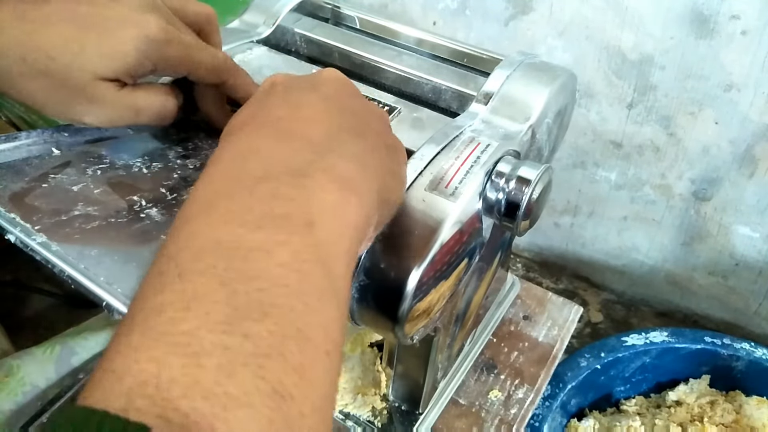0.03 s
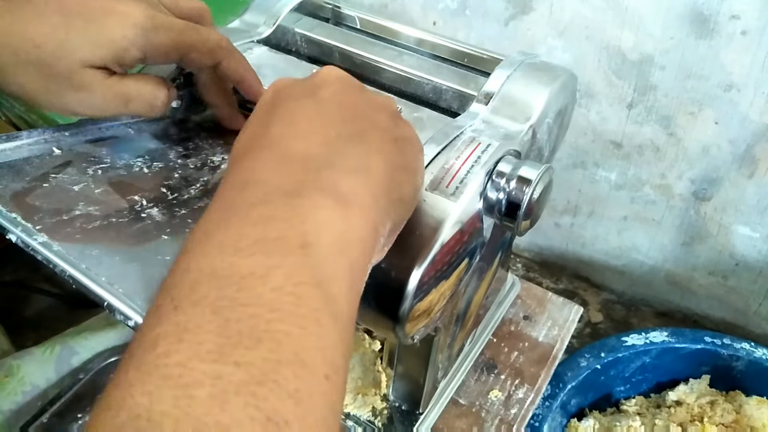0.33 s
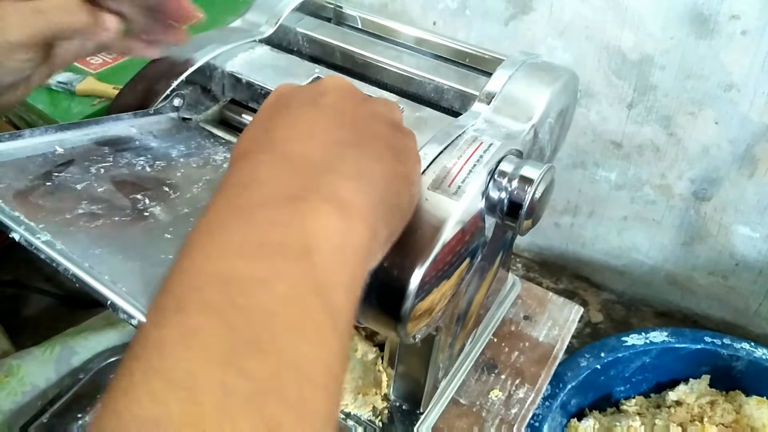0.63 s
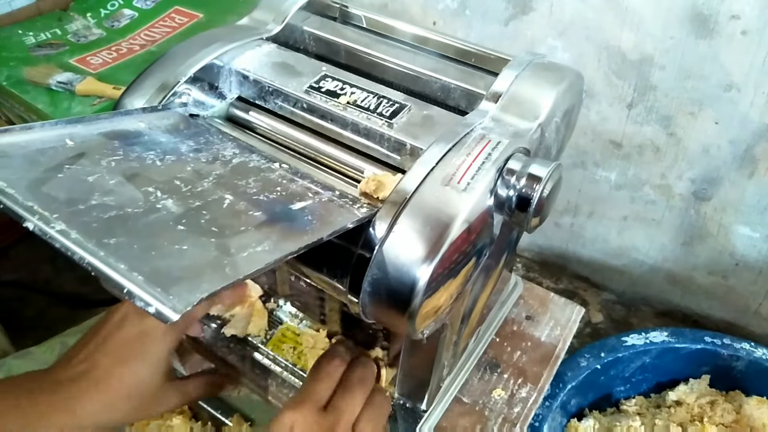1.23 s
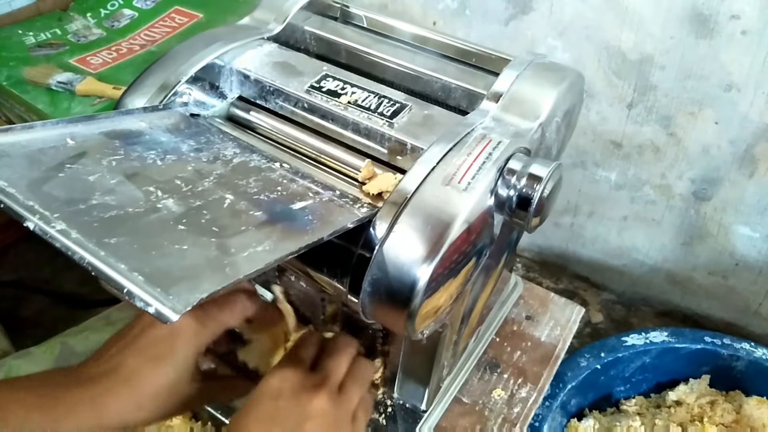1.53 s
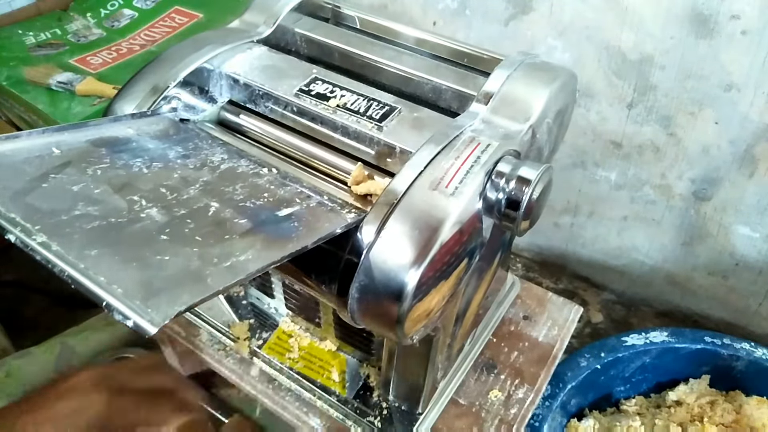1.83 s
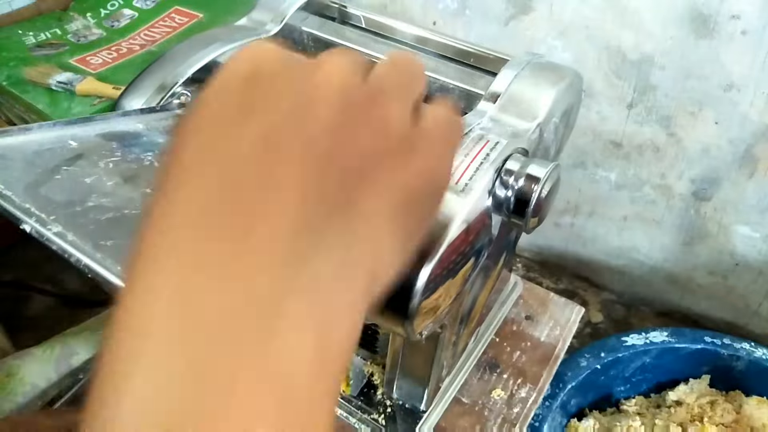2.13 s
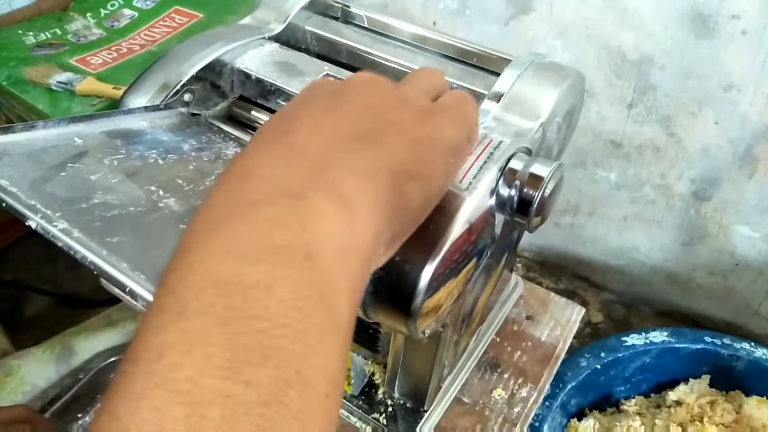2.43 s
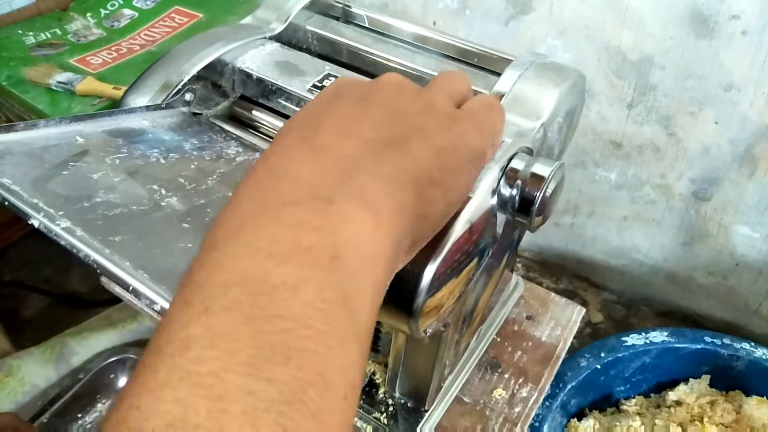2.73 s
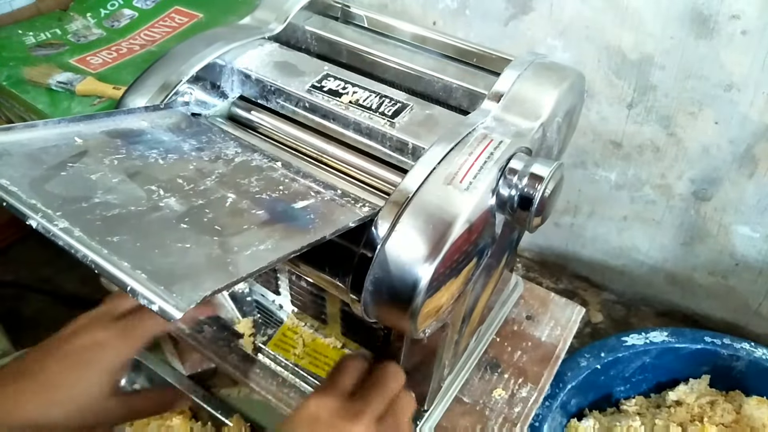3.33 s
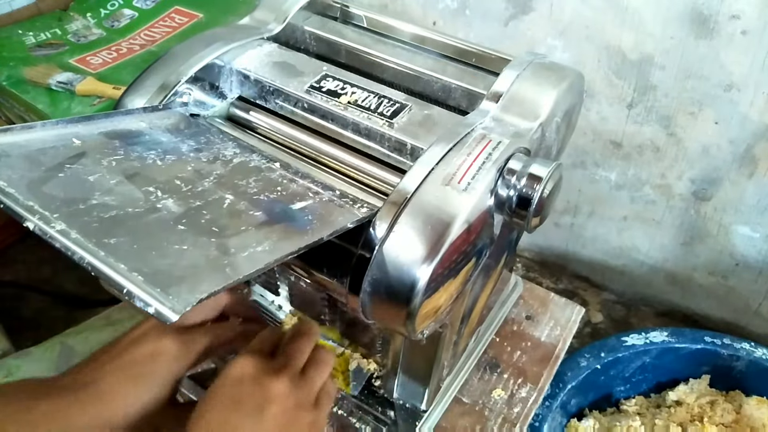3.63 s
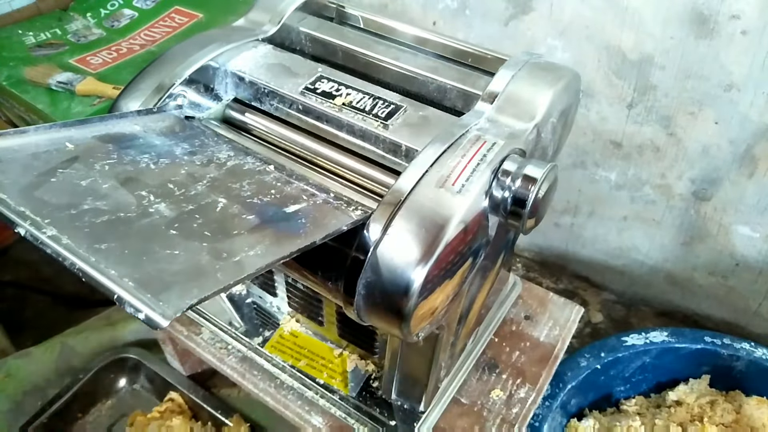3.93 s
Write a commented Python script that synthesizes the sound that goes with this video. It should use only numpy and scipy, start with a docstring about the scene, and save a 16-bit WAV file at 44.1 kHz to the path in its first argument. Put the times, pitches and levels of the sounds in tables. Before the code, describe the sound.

Gears of an electric noodle machine whine and grind close by, amid short metallic rattles.

```python
"""The gears of an electric noodle machine whine and grind close by in a small, hard room.
A 23-tooth pinion (the small gear) drives a 40-tooth wheel, throbbing at a tight spot once per wheel turn.
Worn teeth scrape and ring the steel housing, and loose metal parts rattle in short bursts.
Behind them the motor hums and shakes the table, hands shift the tray twice, and faint groans come and go."""
import sys
import numpy as np
from scipy import signal
from scipy.fft import rfft, irfft
from scipy.io import wavfile
from scipy.ndimage import uniform_filter1d, minimum_filter1d

SR = 44100
rng = np.random.default_rng(int(sys.argv[2]) if len(sys.argv) > 2 else 0)


def int16_out(signal):
    """Quantize to a 16-bit WAV file."""
    q = np.round(np.clip(np.atleast_2d(signal).T, -1, 1) * 32767)
    wavfile.write(sys.argv[1], SR, q.astype(np.int16))


N = 176400
TIME = np.arange(N) / SR


def undb(db):
    """Turn decibels into a number to multiply by."""
    return 10 ** (np.asarray(db) / 20)


def unit(x):
    """Scale a signal to an average power of 1."""
    return x / np.sqrt(np.mean(x ** 2))


def curve(rows):
    """A volume that glides between (time [s], level [dB]) points."""
    return undb(np.interp(TIME, *np.array(rows).T))


def swell(start, length):
    """A rounded rise and fall."""
    return np.sin(np.pi * np.clip((TIME - start) / length, 0, 1))


def wander(per_s):
    """A smooth random drift, roughly 1 up or down."""
    hold = int(SR / per_s)
    steps = np.repeat(rng.standard_normal(N // hold + 1), hold)
    return 1.3 * uniform_filter1d(uniform_filter1d(steps, hold), hold)[:N]


def response(rows, peaks=()):
    """A tone colour in dB: a line through the rows, plus peaks where something rings."""
    freqs = np.arange(N + 1) * SR / (2 * N) + 1e-9
    hz, db = np.array(rows).T
    lifts = sum(lift / (1 + (2 * (freqs - centre) / width) ** 2) for centre, width, lift in peaks)
    return np.interp(np.log(freqs), np.log(hz), db) + lifts


def colour(x, db):
    """Give a sound a tone colour; white noise keeps its power."""
    cepstrum = irfft(np.log(unit(undb(db))))
    cepstrum[1:N] *= 2  # folded so that ringing follows a hit and never comes before it
    cepstrum[N + 1:] = 0
    return irfft(rfft(x, 2 * N) * np.exp(rfft(cepstrum)))[:N]


def ring(x, t60, wet_db):
    """Add a tail of echoes that fades at 60 dB per t60 seconds, keeping the power."""
    t = np.arange(SR // 2) / SR
    tail = rng.standard_normal(len(t)) * np.exp(-np.log(1000) * t / t60)
    echoes = signal.fftconvolve(x, tail / np.linalg.norm(tail))[:N]
    wet = undb(wet_db)
    return (x + wet * echoes) / np.hypot(1, wet)


# Tone colour of the shaking table (frequency [Hz], relative level [dB])
RUMBLE_COLOUR = [(20, -22.5), (45, -5), (55, -9.5), (65, 8), (78, -4.5), (110, -2.5), (190, -2), (270, -9),
                 (310, 2), (390, -9), (700, -23.5), (2000, -65)]
# How loud the table rumbles (time [s], level [dB])
RUMBLE_LOUDNESS = [(0, -33), (.7, -32), (1.6, -32.5), (2.5, -32.5), (2.9, -35.5), (4, -36)]
def motor(hum_hz=100, hum_db=-38.5):
    """The motor hums with the mains power and shakes the table into a rumble."""
    hum = np.sqrt(2) * np.sin(2 * np.pi * hum_hz * TIME) * undb(hum_db + 1.9 * wander(7.3))
    rumble = colour(rng.standard_normal(N), response(RUMBLE_COLOUR))
    return hum + curve(RUMBLE_LOUDNESS) * rumble


# Faint low groans (start [s], length [s], starting pitch [Hz], level [dB])
GROAN_EVENTS = [(1.931, 0.46, 316, -33), (2.66, 0.42, 304, -39.5), (3.7, 0.47, 312, -40.5)]
def groans(sag_hz_per_s=41):
    """A faint low tone comes and goes, sagging in pitch."""
    out = np.zeros(N)
    for start, length, hz, db in GROAN_EVENTS:
        pitch = hz - sag_hz_per_s * (TIME - start) + 3 * wander(25)
        tone = np.sqrt(2) * np.sin(2 * np.pi * np.cumsum(pitch) / SR)
        out += undb(db + 2 * wander(20)) * swell(start, length) * tone
    return out


# Hollow tone colour of the tray (frequency [Hz], relative level [dB])
TRAY_COLOUR = [(300, -39), (580, -25.5), (670, 1.5), (800, -6), (900, -16), (2000, -35), (8000, -70)]
# Shifts of the tray (start [s], length [s], level [dB])
TRAY_SHIFTS = [(0.832, .24, -18.5), (1.342, .08, -18)]
def tray_scrapes():
    """Hands shift the tray, and the uneven rubbing rings its low note."""
    rubbing = rng.standard_normal(N) * undb(1.8 * wander(60))
    hollow = unit(colour(rubbing, response(TRAY_COLOUR)))
    return hollow * sum(undb(db) * swell(start, length) for start, length, db in TRAY_SHIFTS)


# Tone colour of the steel housing (frequency [Hz], relative level [dB])
HOUSING_COLOUR = [(150, -23), (420, -20), (510, -6.5), (590, -2), (740, 0), (950, -4.5), (1300, -8),
                  (2000, -8), (2700, -11.5), (3200, -13.5), (3900, -21.5), (5000, -29.5), (6300, -39),
                  (7600, -61.5), (15000, -64)]
# Notes at which its panels ring (frequency [Hz], width [Hz], boost [dB])
PANEL_NOTES = [(672, 39, 4), (731, 32, 4), (853, 29, 4), (940, 28, 4.5), (1054, 36, 3), (1425, 45, 4),
               (1498, 20, 3.5), (1550, 36, 6.5), (1677, 36, 5.5), (1744, 96, 5), (2219, 42, 4),
               (2304, 38, 4.5), (2405, 63, 7), (2520, 34, 6.5), (2890, 200, 4.5), (3500, 110, 2),
               (4320, 130, 3.5)]
def housing(push, ring_db, tilt_db=0):
    """The steel housing rings briefly with every push and colours its sound."""
    ringing = ring(push, t60=0.065, wet_db=ring_db)
    return colour(ringing, response(HOUSING_COLOUR, PANEL_NOTES) + tilt_db)


# Bursts of rattling (start [s], length [s], body level before boost [dB], tick level before boost [dB])
RATTLE_BURSTS = [(0.149, 0.017, -17, -70.5), (0.459, 0.025, -22.5, -63), (0.765, 0.011, -17, -54.5),
                 (0.91, 0.018, -16.5, -60.5), (1.056, 0.04, -28, -73), (1.22, 0.024, -19, -62),
                 (1.275, 0.015, -17, -58), (1.348, 0.012, -17, -64), (1.407, 0.021, -16.5, -60),
                 (1.495, 0.0065, -30, -68), (1.534, 0.011, -8, -61), (1.553, 0.0192, -18, -55),
                 (1.618, 0.014, -7, -41.5), (1.685, 0.0094, -14.5, -51), (1.837, 0.022, -18.5, -53),
                 (1.895, 0.012, -17.5, -49), (1.977, 0.012, -7.5, -43.5), (2.039, 0.021, -24, -60),
                 (2.119, 0.013, -7.5, -42), (2.17, 0.023, -19.5, -53), (2.26, 0.016, -21, -59),
                 (2.299, 0.014, -12.5, -48), (2.325, 0.02, -15, -50), (2.4, 0.019, -18, -55),
                 (2.451, 0.015, -10.5, -49), (2.47, 0.011, -14, -46), (2.535, 0.014, -18, -58),
                 (2.607, 0.012, -15, -52), (2.774, 0.02, -18, -53), (2.811, 0.028, -19.5, -55),
                 (2.883, 0.034, -18.5, -53), (2.939, 0.026, -19, -52), (3.032, 0.021, -14, -47),
                 (3.099, 0.016, -13.5, -42.5), (3.174, 0.0091, -25, -53), (3.184, 0.015, -19, -48),
                 (3.219, 0.016, -16.5, -49.5), (3.313, 0.011, -14.5, -48), (3.346, 0.0097, -18, -48),
                 (3.379, 0.014, -16, -47), (3.435, 0.0062, -14, -47), (3.455, 0.015, -10, -36),
                 (3.525, 0.019, -16, -47.5), (3.598, 0.0079, -20, -58), (3.664, 0.033, -18.5, -50.5),
                 (3.723, 0.034, -20.5, -55), (3.8, 0.017, -19.5, -53), (3.832, 0.019, -16.5, -46.5),
                 (3.945, 0.02, -11, -40)]
# How a rattle's colour differs from the housing's (frequency [Hz], change [dB])
RATTLE_COLOUR = [(300, -6), (700, -2), (1500, -1), (3000, 1.5), (6000, 4), (15000, -2)]
# Bright tick of metal on metal (frequency [Hz], relative level [dB])
TICK_COLOUR = [(2000, -10), (4400, 5.5), (6000, 10), (8000, 3), (11000, -2.5), (13500, -2.5), (15500, -5)]
# Notes at which the loose parts ring (frequency [Hz], width [Hz], boost [dB])
PART_NOTES = [(2450, 140, 8), (4560, 230, 7.5), (5400, 180, 2.5), (9500, 670, 1.5), (13300, 900, 3)]
def rattles(hits_per_s=1800, rise_s=0.0029, fall_s=0.0018, body_boost_db=3.5, tick_boost_db=9):
    """Loose steel parts chatter in bursts of tiny hits that ring the housing and tick brightly."""
    hits = (rng.random(N) < hits_per_s / SR) * rng.choice([-1, 1], N)
    strength = undb(2.5 * rng.standard_normal(N))
    chatter = unit(hits * strength) + 0.67 * rng.standard_normal(N)
    body, ticks = np.zeros(N), np.zeros(N)
    for start, length, body_db, tick_db in RATTLE_BURSTS:
        rise = np.clip((TIME - start) / rise_s, 0, 1)
        shape = rise * np.exp(-np.clip((TIME - start - length) / fall_s, 0, 20))
        burst = shape * chatter
        burst *= np.linalg.norm(shape) / (np.linalg.norm(burst) + 1e-9)  # as strong with few hits as many
        body += undb(body_db + body_boost_db) * burst
        ticks += undb(tick_db + tick_boost_db) * burst
    steel = housing(body, ring_db=-10.5, tilt_db=response(RATTLE_COLOUR))
    ringing_ticks = ring(ticks, t60=0.33, wet_db=-5.5)
    return steel + colour(ringing_ticks, response(TICK_COLOUR, PART_NOTES))


MESH_HZ, PINION_TEETH, WHEEL_TEETH = 569.4, 23, 40  # teeth meeting per second; teeth on each gear
def tight_spot(teeth, first_s=0.023, half_width_s=0.009):
    """A bump from 0 to 1 and back as the gears press harder once per wheel turn."""
    turns = (teeth - first_s * MESH_HZ) / WHEEL_TEETH
    away_s = (turns - np.round(turns)) * WHEEL_TEETH / MESH_HZ
    return np.exp(-(away_s / half_width_s) ** 2)


# How loud the teeth grind (time [s], level [dB])
GRIND_LOUDNESS = [(0, -16), (.35, -19), (.7, -18), (.92, -17), (1.15, -16), (1.45, -15.5), (1.78, -17.5),
                  (2.3, -16), (2.7, -18.5), (3.4, -17.5), (4, -15.5)]
def grinding(teeth, scatter_db=1.5, fade_teeth=0.51, wear_db=-16, throb=0.25):
    """Each tooth scrapes with its own force; the pinion's wear marks come back every turn."""
    strength = undb(scatter_db * rng.standard_normal(N))[teeth.astype(int)]
    scrape = rng.standard_normal(N) * strength * np.exp(-(teeth % 1) / fade_teeth)
    turn_samples = int(SR * PINION_TEETH / MESH_HZ)
    place_in_turn = (teeth / PINION_TEETH % 1 * turn_samples).astype(int)
    wear = rng.standard_normal(turn_samples)[place_in_turn] * strength
    force = (1 + throb * tight_spot(teeth)) * undb(0.79 * wander(45))
    push = unit((unit(scrape) + undb(wear_db) * unit(wear)) * force)
    return curve(GRIND_LOUDNESS) * unit(housing(push, ring_db=-7.5))


# Side tones of the pinion (pitch [cycles per turn])
PINION_TONES = [22, 24, 26, 30, 45, 46, 48, 57, 68, 70, 71, 93, 94]
# How loud each one is (level [dB])
PINION_LEVELS = [-36.5, -31, -41.5, -34, -37, -36, -42.5, -37, -37, -36.5, -37.5, -40.5, -40.5]
# Side tones of the wheel (pitch [cycles per turn])
WHEEL_TONES = [16, 32, 47, 48]
# How loud each one is (level [dB])
WHEEL_LEVELS = [-43.5, -43.5, -40, -31]
# How loud the main gear tone is (time [s], level [dB])
WHINE_LOUDNESS = [(0, -13), (.6, -14.5), (.85, -16.5), (1.45, -14), (1.75, -18.5), (2.05, -15.5),
                  (2.55, -15), (3.2, -17.5), (3.5, -17.5), (4, -15)]
def whine(teeth, throb=0.71, flutter_db=1.53):
    """Meeting teeth make a tone that throbs at the tight spot; both uneven gears add side tones."""
    force = unit((1 + throb * tight_spot(teeth)) * undb(flutter_db * wander(34.84)))
    out = curve(WHINE_LOUDNESS) * force * np.sin(2 * np.pi * teeth)  # one cycle per tooth
    gears = (PINION_TEETH, PINION_TONES, PINION_LEVELS), (WHEEL_TEETH, WHEEL_TONES, WHEEL_LEVELS)
    for tooth_count, tones, levels in gears:
        for per_turn, db in zip(tones, levels):
            cycles = per_turn * teeth / tooth_count + rng.random() + 0.077 * wander(12)
            out += undb(db + 2.6 * wander(14)) * np.sin(2 * np.pi * cycles)
    return np.sqrt(2) * out


def scene(speed_drift=0.0005, hiss_db=-71.5):
    """Mix the machine with a faint hiss; the grinding, rattles and scrapes echo in the room."""
    teeth = np.cumsum(MESH_HZ * (1 + speed_drift * wander(2))) / SR  # teeth that have met so far
    clatter = ring(grinding(teeth) + rattles() + tray_scrapes(), t60=0.7, wet_db=-13.5)
    mix = whine(teeth) + clatter + motor() + groans()
    return (mix + undb(hiss_db) * rng.standard_normal(N))[None]


def record(dry, threshold_db=-6.5, ratio=1.6, memory_s=0.036, ceiling=1.0, top_hz=15200):
    """A gentle compressor turns loud bursts down, a fast limiter holds peaks, and the top treble is cut."""
    memory = np.exp(-1 / (memory_s * SR))
    loudness = np.sqrt(signal.lfilter([1 - memory], [1, -memory], dry[0] ** 2))
    squeezed = dry[0] * np.maximum(loudness / undb(threshold_db), 1) ** (1 / ratio - 1)
    limiter = np.minimum(1, ceiling / (np.abs(squeezed) + 1e-9))
    limiter = uniform_filter1d(minimum_filter1d(limiter, size=221), size=221)  # smoothed over 5 ms
    treble_cut = signal.ellip(8, .2, 70, top_hz, fs=SR, output="sos")
    return signal.sosfilt(treble_cut, squeezed * limiter)[None]


dry = scene()
out = record(dry)
int16_out(out)
```